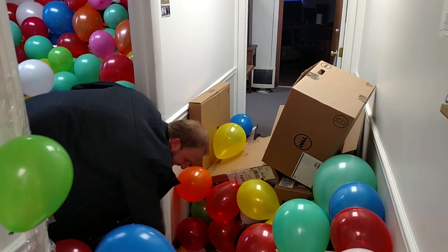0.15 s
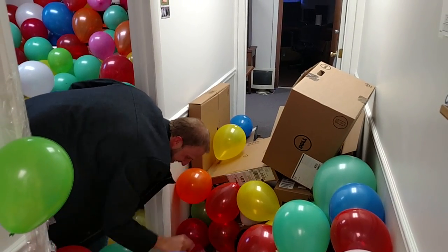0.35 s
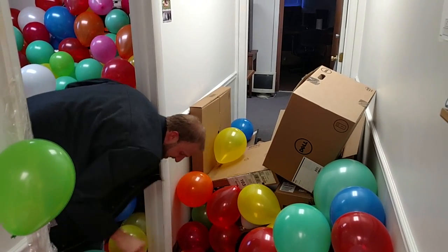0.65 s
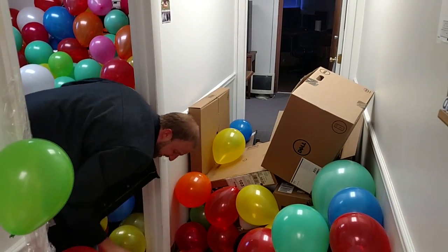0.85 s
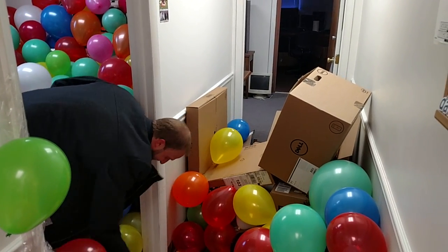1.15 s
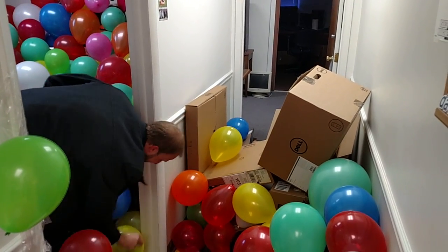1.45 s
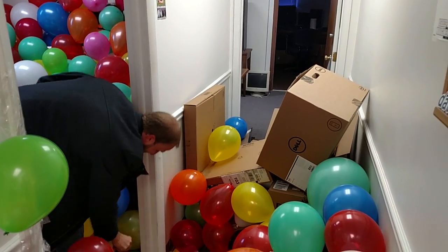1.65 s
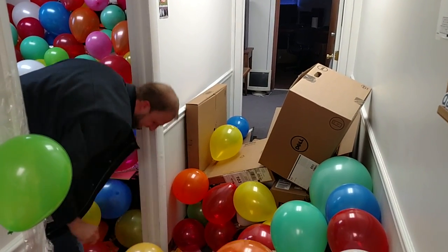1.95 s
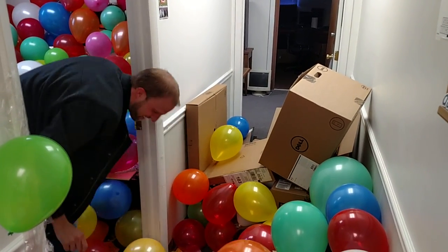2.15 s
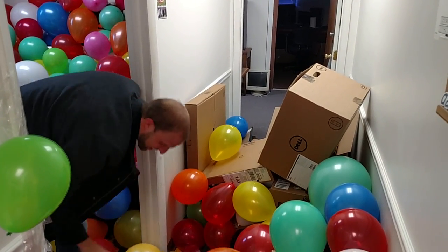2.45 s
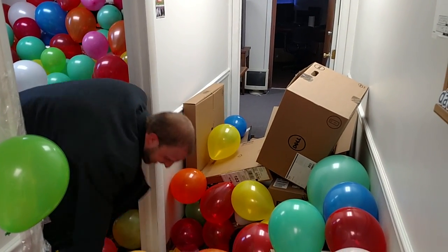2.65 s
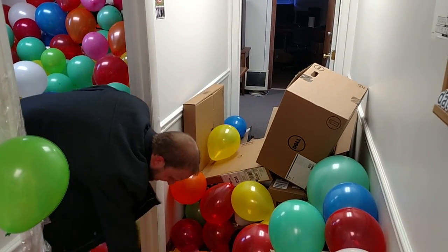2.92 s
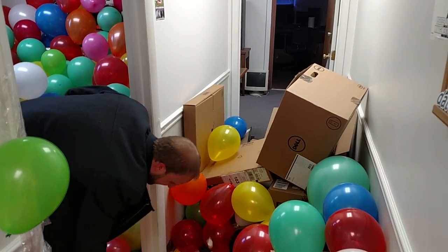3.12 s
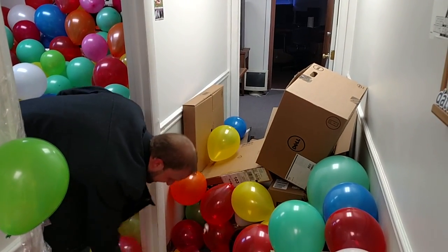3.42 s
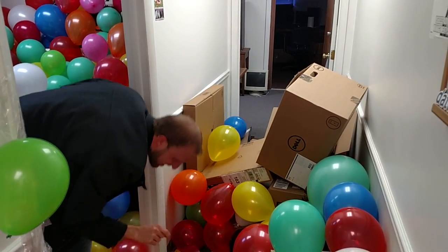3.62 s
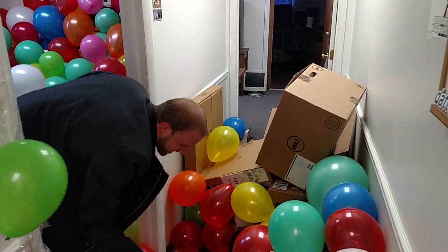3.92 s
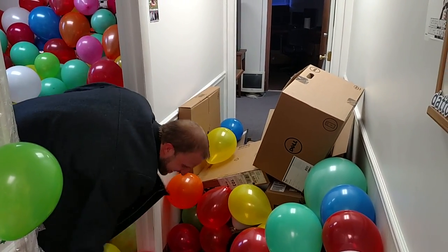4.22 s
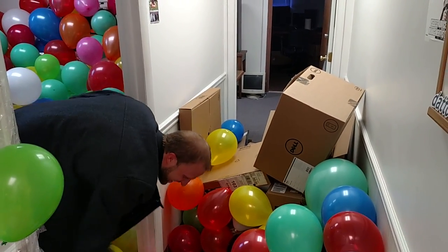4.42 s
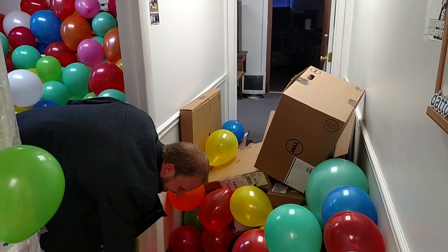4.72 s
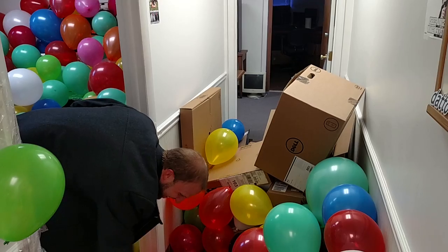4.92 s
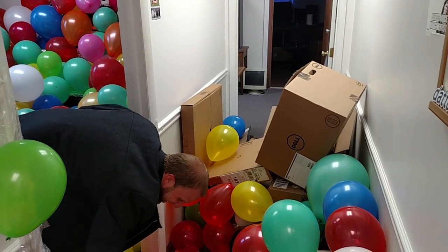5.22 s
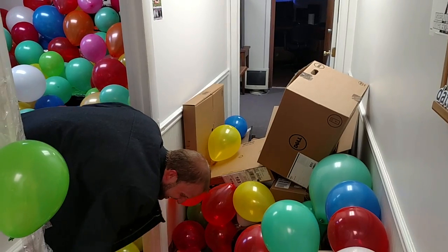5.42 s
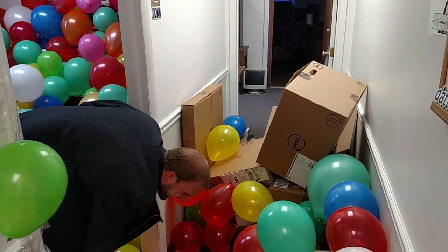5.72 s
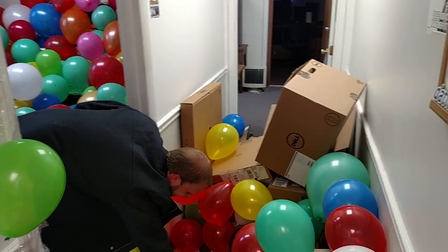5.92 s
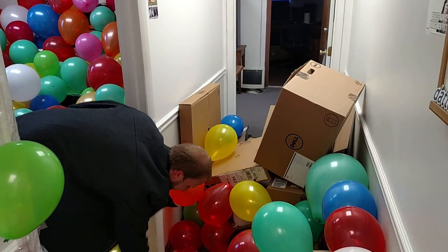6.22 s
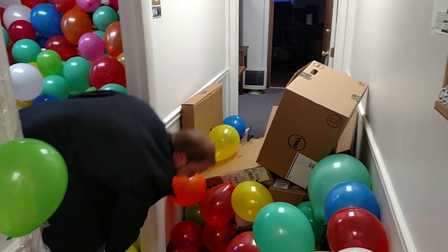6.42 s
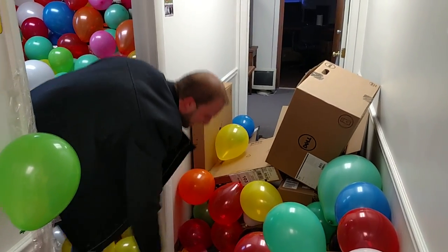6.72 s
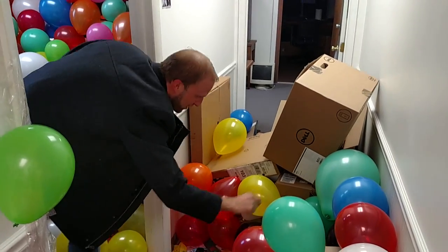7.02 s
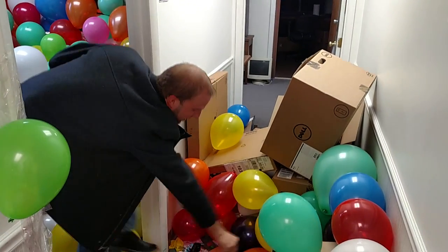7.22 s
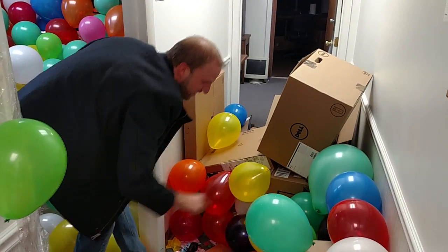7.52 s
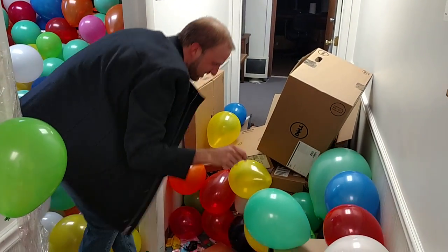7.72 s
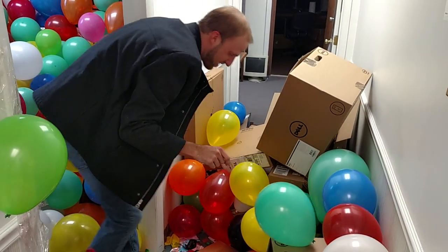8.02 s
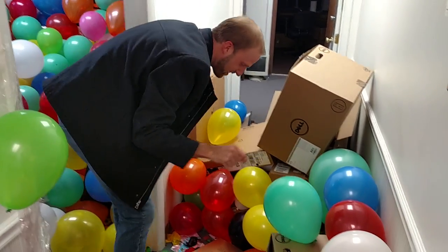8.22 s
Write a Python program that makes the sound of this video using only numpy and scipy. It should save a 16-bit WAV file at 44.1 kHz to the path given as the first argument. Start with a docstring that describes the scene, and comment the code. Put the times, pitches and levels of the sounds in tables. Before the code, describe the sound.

Rubber balloons burst by hand one after another in a narrow hallway, sharp loud pops with short boomy echoes over faint rubbery shuffling.

```python
"""A narrow hallway heaped with balloons, where rubber balloons are burst one after another.
Each burst is a short push-and-suction pressure wave that slaps between the walls, excites decaying
hallway modes and leaves a diffuse tail of filtered noise. The heap shuffles softly as lumpy noise
with small ticks, over faint hiss. The recorder overloads on bursts and gates quiet sound."""
import sys
import numpy as np
from scipy import signal
from scipy.fft import rfft, irfft, next_fast_len
from scipy.io import wavfile
from scipy.ndimage import uniform_filter1d

SR = 44100
rng = np.random.default_rng(int(sys.argv[2]) if len(sys.argv) > 2 else 0)


def pcm_store(signal):
    """Save signal as 16-bit PCM."""
    levels = np.round(np.clip(np.atleast_2d(signal), -1, 1) * 32767)
    wavfile.write(sys.argv[1], SR, levels.astype(np.int16).T)


N = 368676  # length [samples]


def gain_of(db):
    """Logarithmic level: decibels become an amplitude factor."""
    return 10 ** (np.asarray(db) / 20)


def evened(x):
    """Normalisation: scales to a root mean square of 1."""
    return x / np.sqrt(np.mean(x ** 2) + 1e-20)


def read(points, hz, axis=1):
    """Interpolation on a log-frequency axis: reads one column of a table."""
    rows = np.transpose(points)
    return np.interp(np.log(hz + 1), np.log(rows[0] + 1), rows[axis])


def lobe(u):
    """Half-sine pulse: one smooth rise and fall while u runs from 0 to 1."""
    return np.sin(np.pi * np.clip(u, 0, 1))


def wave(t, push, suction, push_db, suction_db):
    """Pressure release: freed air pushes out, then overshoots into suction; the microphone inverts it."""
    pushing = gain_of(push_db) * lobe(t / push)
    sucking = gain_of(suction_db) * lobe((t - push) / suction)
    return sucking - pushing


# direct wave, then wall echoes: (push level [dB], suction level [dB], stretch of the push [factor])
SLAPS = [(-1, 3, 1.1), (1, -1, 1.7), (-4, -13, 1.7)]
# a small source sends out little deep bass; the skin takes a moment to open: (low, high edge [Hz])
BLAST_BAND_HZ = [64, 4000]
# a longer or stronger push overshoots for longer
SUCTION_MS, SUCTION_PER_PUSH, SUCTION_MS_PER_DB = 1.35, 0.7, 0.22
SOFT_DB = -4.5  # blasts under this overshoot no shorter


def blast_and_slaps(t, blast_db, push_ms, echo_ms):
    """Flutter echo: the pressure wave returns from the walls at equal delays."""
    suction_ms = SUCTION_MS + SUCTION_PER_PUSH * push_ms + SUCTION_MS_PER_DB * max(blast_db, SOFT_DB)
    push, suction, echo = push_ms / 1000, suction_ms / 1000, echo_ms / 1000
    blast = np.zeros(len(t))
    for k, (push_db, suction_db, wide) in enumerate(SLAPS):
        # an echo is spread by the soft heap: its push is longer but ends one delay after the last
        since_start = t - k * echo + (wide - 1) * push
        blast += wave(since_start, wide * push, suction, push_db, suction_db)
    band = signal.butter(2, BLAST_BAND_HZ, "band", fs=SR)
    return gain_of(blast_db) * signal.lfilter(*band, blast)


# hallway modes: (frequency [Hz], relative level [dB], t60 before the burst's decay factor [s])
HALL_MODES = [(158, -3.5, 0.42), (237, -3, 0.36), (282, -3.5, 0.058), (350, -11, 0.21)]
RING_DB = -3.5  # modes against the boom


def hallway_ring(t, echo_ms, linger, boom_db):
    """Modal resonance: standing waves of the hallway build up, then decay exponentially."""
    hz, db, t60 = np.transpose(HALL_MODES)[:, :, None]
    db = db - 14.0 * np.log(hz * echo_ms / 1000) ** 2  # modes near the slap rate are driven hardest
    db = db + 3 * rng.standard_normal(db.shape)  # each spot excites the modes differently
    decay = gain_of(db - 60 * t / (t60 * linger))
    ring = -(decay * np.sin(2 * np.pi * hz * t)).sum(axis=0)
    build_up = 1 - np.exp(-(t / 0.047) ** 2)  # over a few crossings
    return ring * gain_of(boom_db + RING_DB) * build_up


# interpolation centres of boom, body, crack, sizzle: (frequency [Hz])
BANDS_HZ = [230, 700, 2000, 5500]
# spectral shape before the honk and band levels: (frequency [Hz], relative level per Hz [dB])
TAIL_COLOUR = [(30, -36.5), (90, -25), (170, -2), (250, -1), (450, -13), (800, -18), (1200, -26.5),
               (2300, -29.5), (3300, -35.5), (4500, -45.5), (7000, -50), (10000, -60), (16000, -68.5)]
# two-stage decay, t60 before the burst's factor:
# (frequency [Hz], early t60 [s], late t60 [s], late share [dB])
TAIL_DECAY = [(102, 0.41, 0.2, -7.5), (236, 0.067, 0.34, -1), (704, 0.067, 0.28, -10.5),
              (2050, 0.078, 0.28, -12.5), (3470, 0.059, 0.25, -14), (6000, 0.077, 0.35, -16),
              (13000, 0.1, 0.16, -8.5)]


def reverberation(t, honk_hz, honk_db, linger, levels_db):
    """Diffuse decay: torn rubber and scattered echoes as noise that dies first fast, then slowly."""
    hz = np.fft.rfftfreq(len(t), 1 / SR)
    honk = honk_db * np.exp(-(np.log((hz + 1) / honk_hz) / 0.3) ** 2)
    shape = gain_of(read(TAIL_COLOUR, hz) + honk)
    colour = np.zeros(len(hz))
    for level_db, one_band in zip(levels_db, np.eye(len(BANDS_HZ))):
        band = shape * read(np.c_[BANDS_HZ, one_band], hz)
        colour += gain_of(level_db) * evened(band)
    noise = irfft(rfft(rng.standard_normal(len(t))) * colour, len(t))

    f, frames, z = signal.stft(noise, SR, nperseg=256, noverlap=224)
    early, late, share_db = (read(TAIL_DECAY, f, axis=k)[:, None] for k in (1, 2, 3))
    early_fall = gain_of(-60 * frames / (early * linger))
    late_fall = gain_of(share_db - 60 * frames / (late * linger))
    # bass needs some cycles to fill the hallway
    filling = 1 - np.exp(-((frames + 0.0012) * (f[:, None] + 50) / 4.3) ** 2)
    fall = np.hypot(early_fall, late_fall) * filling
    tail = signal.istft(z * fall, SR, nperseg=256, noverlap=224)[1][:len(t)]
    onset = 1 - np.exp(-t / 0.00082)
    return gain_of(7.0) * tail * onset


SIZZLE_DB = -12.5  # sizzle against crack


def pop(blast_db, push_ms, echo_ms, honk_hz, honk_db, linger, boom_db, body_db, crack_db):
    """Superposition: one burst sums the wave with its slaps, the modes and the diffuse tail."""
    t = np.arange(SR // 2) / SR
    levels_db = boom_db, body_db, crack_db, crack_db + SIZZLE_DB
    blast = blast_and_slaps(t, blast_db, push_ms, echo_ms)
    ring = hallway_ring(t, echo_ms, linger, boom_db)
    return blast + ring + reverberation(t, honk_hz, honk_db, linger, levels_db)


# balloons and clothes moving: (time [s], level [dB])
SHUFFLE = [(0, -54.5), (1.7, -55.5), (2.2, -60.5), (2.4, -57), (4.101, -56), (4.191, -62.5), (4.22, -54),
           (4.34, -57), (4.415, -61), (4.442, -74), (4.475, -59.5), (6.3, -55.5), (6.69, -60),
           (6.77, -55.5), (7.05, -60), (7.11, -54), (7.5, -55), (7.75, -62.5), (7.959, -55.5),
           (8.03, -57.5), (8.36, -56.5)]
# spectral shape of the rubbing: (frequency [Hz], relative level per Hz [dB])
SHUFFLE_COLOUR = [(25, -3), (60, -2), (110, -0.5), (190, 2), (350, -7), (700, -15), (1500, -22.5),
                  (3500, -33.5), (7000, -44.5), (16000, -52.5)]
LUMPS_DB = 1.6  # rms wander of the noise level before colouring
TICKS_DB, TICKS_PER_S = -23.5, 190  # level against the rubbing, mean rate


def rubbing():
    """Friction noise: coloured noise whose level wanders in lumps."""
    wander = uniform_filter1d(rng.standard_normal(N), size=600)
    lumps = evened(uniform_filter1d(wander, size=600))
    noise = rng.standard_normal(N) * gain_of(LUMPS_DB * lumps)
    size = next_fast_len(N)
    hz = np.fft.rfftfreq(size, 1 / SR)
    colour = gain_of(read(SHUFFLE_COLOUR, hz))
    return evened(irfft(rfft(noise, size) * colour, size)[:N])


def slip_ticks():
    """Stick-slip: rubber slips at random instants, as small bright impulses of either sign."""
    sizes = gain_of(3 * np.minimum(rng.exponential(1, N), 4))
    ticks = sizes * (rng.random(N) < TICKS_PER_S / SR) * rng.choice([-1, 1], N)
    return evened(signal.lfilter(*signal.butter(1, [700, 3000], "band", fs=SR), ticks))


def shuffle():
    """Amplitude envelope: soft rubbing and ticks share one slowly changing level."""
    s, db = np.transpose(SHUFFLE)
    level = gain_of(np.interp(np.arange(N) / SR, s, db))
    return (rubbing() + gain_of(TICKS_DB) * slip_ticks()) * level


def hiss():
    """Self-noise: the microphone adds faint white noise."""
    return gain_of(-85.5) * rng.standard_normal(N)


def add(mix, s, sound):
    """Linear mixing: adds a sound at time s, which may lie before the start."""
    at = round(s * SR)
    skipped = max(-at, 0)
    part = mix[max(at, 0):][:len(sound) - skipped]
    part += sound[skipped:][:len(part)]


# one row a balloon; reverberation levels are relative, and the honk is the tearing skin's:
# (time [s], blast level [dB], push before stretching [ms], wall echo delay [ms],
#  honk frequency [Hz], honk boost before band levels [dB], decay time [factor],
#  boom level [dB], body level [dB], crack level [dB])
POPS = [(-0.04, -3, 1.1, 1.8, 1490, 7.5, 0.84, -11.5, -20.5, -21.5),
        (0.2519, -1.46, 1.33, 4.26, 1590, 12.5, 0.84, -17, -22.5, -26.5),
        (0.5433, -4, 0.77, 3.7, 2350, -1.5, 0.79, -18, -17.5, -21),
        (0.8377, -2.5, 0.65, 3.68, 2170, 4.5, .84, -23, -16, -24.5),
        (1.1312, -3, 1.21, 3.94, 1356, 5, 0.91, -18.5, -19, -31.5),
        (1.425, -13.5, 1.48, 4.3, 828, 9.5, 0.86, -21, -25.5, -36),
        (1.737, -1.5, .95, 3.95, 1030, -4, 0.83, -18, -14.5, -26),
        (2.4216, -3, 0.8, 3.82, 2190, 6.5, 0.85, -25.5, -13, -22),
        (2.7273, -2, 1.05, 4.4, 1820, 9.5, .97, -21, -21.5, -28.5),
        (3.0081, -0.5, 1.83, 4.07, 1440, 9, 0.76, -15.5, -23.5, -26),
        (3.2454, -1.5, 1.39, 4.03, 2064, 8.5, .81, -16, -16, -26),
        (3.466, -2.5, 1.31, 4.29, 1905, 9.5, .92, -16, -21, -24.5),
        (3.8562, 4, 0.94, 4.24, 1875, -3, 0.72, -10.5, -13.5, -16),
        (4.565, -3, 1.11, 4.02, 2300, -0.5, .83, -16.5, -16, -24),
        (4.8378, -6, 1.74, 4.17, 1362, 7, 0.86, -17.5, -24.5, -34),
        (5.1404, 0.46, 1.22, 4.22, 2120, 0.5, 0.79, -15, -17.5, -26.5),
        (5.3965, -2.5, 1.44, 4.34, 1400, 9, 0.79, -15, -23, -26.5),
        (5.6553, -3.5, 1.53, 4.23, 1590, 12.5, 0.88, -18, -21, -28.5),
        (5.9621, 0.1, 1.08, 4.22, 1940, -2, 0.84, -14, -17, -22.5),
        (6.3318, -3, 0.92, 3.57, 2410, 5, 0.9, -22.5, -18.5, -27),
        (7.2837, 3.5, 0.95, 3.52, 1990, 2.5, 0.77, -11, -15.5, -21.5)]


def scene():
    """Superposition of sources: all bursts over the shuffling heap and the hiss."""
    mix = shuffle() + hiss()
    for s, *burst in POPS:
        add(mix, s, pop(*burst))
    return mix[None]


GATE_DB = -57.5  # opening threshold
BASS_HZ, EDGE_HZ = 50, 15600  # the recorder rolls off below and above these


def leak(v, tau):
    """First-order relaxation: a leaky average with time constant tau in seconds."""
    step = 1 / (tau * SR)
    return signal.lfilter([step], [1, step - 1], v)


def overload_offset(dry):
    """Capacitor charging: pressure far beyond the negative rail leaves an offset that swings back slowly."""
    over = np.minimum(dry + 1.2, 0)
    charge = 5 * leak(over, 0.022)
    return charge - leak(charge, 0.15)


def noise_gate(x):
    """Threshold gating: snaps open on loud samples, then fades shut exponentially."""
    n = np.arange(N)
    loud = abs(x) > gain_of(GATE_DB)
    last_loud = np.maximum.accumulate(np.where(loud, n, -SR), axis=1)
    return uniform_filter1d(np.exp(-(n - last_loud) / (0.0018 * SR)), size=9, axis=1)


def record(dry):
    """Nonlinear recording: lopsided overload, a fast gate, clipping and the band limit."""
    offset = overload_offset(dry)
    gate = noise_gate(dry + offset)  # the offset alone can hold the gate open
    x = signal.lfilter(*signal.butter(1, BASS_HZ, "high", fs=SR), dry * gate)
    x = np.clip(x, -1, 1) + offset * gate
    taps = signal.firwin(511, EDGE_HZ, window=("kaiser", 9), fs=SR)
    return np.clip(signal.oaconvolve(x, taps[None], "same"), -1, 1)


dry = scene()
out = record(dry)
pcm_store(out)
```